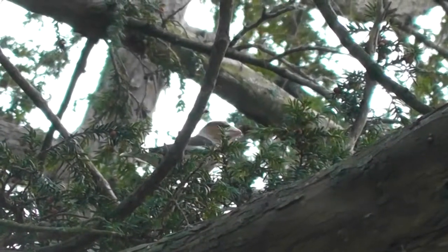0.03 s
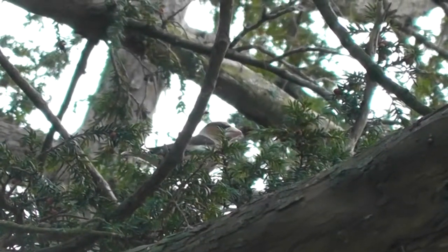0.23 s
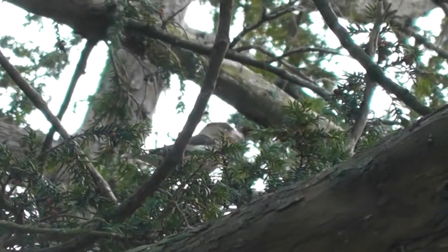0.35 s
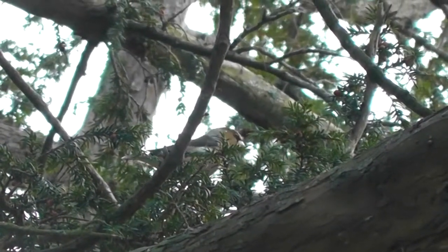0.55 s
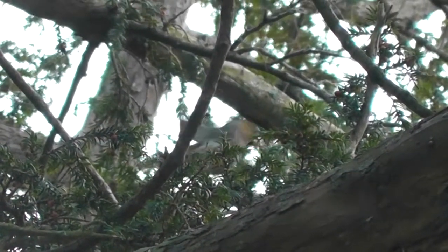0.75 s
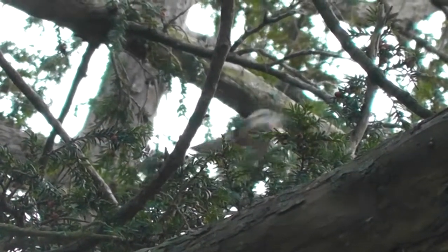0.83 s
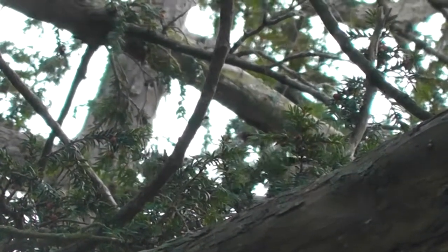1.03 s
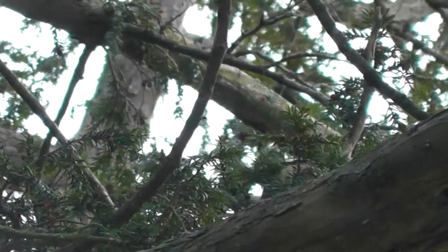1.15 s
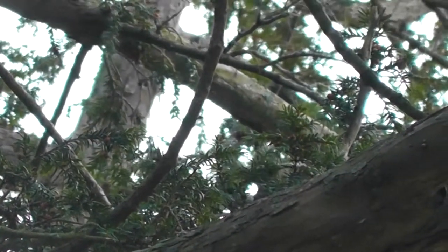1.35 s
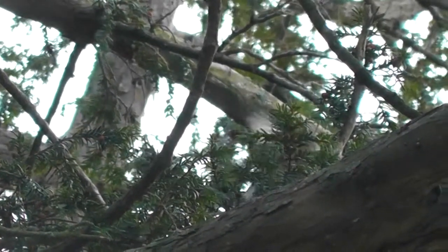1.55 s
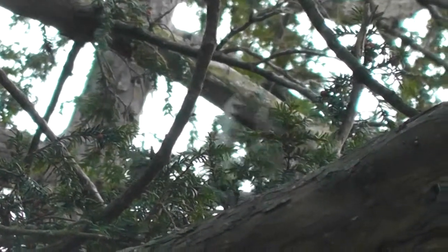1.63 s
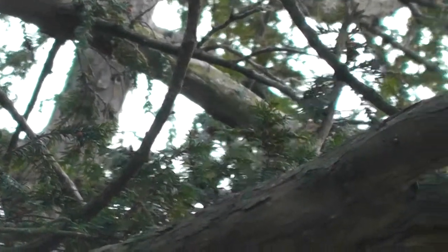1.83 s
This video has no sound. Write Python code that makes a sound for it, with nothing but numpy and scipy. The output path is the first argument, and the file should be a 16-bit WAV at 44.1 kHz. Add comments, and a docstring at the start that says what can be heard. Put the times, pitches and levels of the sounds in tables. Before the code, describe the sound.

A small bird calls twice from dense evergreen foliage: first a high, thin whistle, then a brief, louder buzz. Afterwards the quiet outdoor hush carries on, with faint far-off birds, soft twig clicks and one sharp little snap.

```python
"""A small bird in a dense evergreen gives a thin falling whistle, then a lower, louder buzz.
Each call is a tone on a moving pitch; the buzz comes from a fast vibrato, a wobble of that pitch.
Trunks and foliage scatter the calls into a short fluttering tail. Other birds call faintly farther off.
Twigs tick, knock softly and give one sharp snap, over a low outdoor hush of filtered noise."""
import sys
import numpy as np
from scipy import signal
from scipy.fft import rfft, irfft
from scipy.io import wavfile
from scipy.ndimage import uniform_filter1d

SR = 44100
rng = np.random.default_rng(int(sys.argv[2]) if len(sys.argv) > 2 else 0)


def log_audio(samples):
    """Write samples as a 16-bit WAV file to the path given in sys.argv[1]."""
    # one column per channel
    frames = np.atleast_2d(samples).T
    # limit to full scale, then quantise
    limited = np.clip(frames, -1, 1)
    pcm = np.round(limited * 32767).astype(np.int16)
    wavfile.write(sys.argv[1], SR, pcm)


N = 83790

# tone of the outdoor hush (frequency [Hz], relative level [dB])
HUSH_TONE = [(25, -19.5), (45, -5.5), (96, 1.5), (257, .5), (392, -3), (700, -7), (1100, -11.5),
             (1900, -17), (2710, -25), (3500, -23.5), (4000, -21), (6200, -23), (9000, -30), (12500, -38.5),
             (13700, -43)]
# stereo width of the hush (frequency [Hz], side against middle [dB])
HUSH_WIDTH = [(40, -2), (150, -7), (500, -3.5), (1500, -4), (12000, -15.5)]
# far peeps (start [s], length [s], pitch [Hz], level [dB])
PEEPS = [(0.13, 0.025, 850, -63.5), (1.195, 0.045, 3990, -67), (1.578, 0.019, 2100, -63),
         (1.601, 0.055, 1750, -70), (1.3, 0.065, 3970, -76)]
# faint high twitters (start [s], length [s], first pitch [Hz], last pitch [Hz], level [dB])
FAR_TWITTERS = [(0.941, .05, 7600, 7000, -75), (0.994, 0.043, 6500, 6270, -72),
                (1.036, 0.05, 7300, 7780, -84), (1.113, 0.043, 6000, 5670, -73),
                (1.865, 0.065, 6700, 7340, -66)]
# stereo width of the scattered sound (frequency [Hz], side against middle [dB])
FOLIAGE_WIDTH = [(1000, -0.5), (4000, -10.5), (5500, -11), (8000, -8), (12000, 2.5)]
# the whistle's tune (time [s], pitch [Hz])
WHISTLE_TUNE = [(.166, 7450), (.173, 6000), (.179, 5520), (.186, 5340), (.215, 5170), (.235, 5200),
                (.262, 5278), (.308, 5368), (.319, 5443), (.329, 5270)]
# how hard the bird whistles (time [s], level [dB])
WHISTLE_EFFORT = [(.166, -59), (.173, -42.5), (.186, -34), (.2, -29.5), (.228, -33), (.3, -34),
                  (.318, -27.5), (.329, -44)]
# the whistle's overtone, an octave up (time [s], level against the main tone [dB])
WHISTLE_OCTAVE = [(.168, -31), (.18, -10.5), (.19, -37.5), (.225, -42), (.24, -32), (.32, -26.5)]
# foliage soaks up the overtones (frequency [Hz], gain [dB])
LEAF_FILTER = [(5000, 1.5), (8000, -4), (12000, -4.5)]
# echoes off nearby trunks and boughs (delay [s], gain [dB])
BOUGH_ECHOES = [(.005, -14), (0.0134, -16), (0.022, -21), (0.033, -17), (.052, -15.5)]
# the near bird's direct sound leans left in the treble (frequency [Hz], right ear gain [dB])
RIGHT_EAR_SHADE = [(4000, -1.2), (5300, -2.5), (8000, -5), (12000, -11)]
# small twig ticks (time [s], level [dB], ring [Hz])
TWIG_TICKS = [(.4295, -55, 8600), (.4435, -57.5, 9700), (.4565, -61, 8800), (.865, -49, 8950),
              (.9675, -59.5, 7660), (1.2595, -59.5, 8900), (1.3115, -54, 6200), (1.373, -53.5, 8900),
              (1.807, -55.5, 5700), (1.8455, -49, 5650), (1.882, -66, 4570)]
# twigs lose their highest treble (frequency [Hz], gain [dB])
TWIG_FILTER = [(8800, -2), (10500, -7.5), (13500, -6)]
# the buzz (time [s], centre pitch [Hz], level [dB], harmonic 2 [dB], harmonic 3 [dB]);
# both harmonics are set against the main tone
BUZZ_SHAPE = [(.524, 3900, -49, -30.5, -40.5), (.533, 3960, -31, -30, -37.5), (.553, 3946, -24.5, -38, -38),
              (.58, 4050, -26.5, -25, -40), (.6, 4110, -25, -24.5, -39.5),
              (.625, 4090, -26.5, -30.5, -43.5), (.636, 4080, -27.5, -21, -38)]
# soft knocks (time [s], level [dB], ring [Hz])
SOFT_KNOCKS = [(1.194, -42, 660), (1.526, -40, 280), (1.846, -47.5, 960)]
# the two quick breaks of one snap (time [s], level [dB])
SNAP_BREAKS = [(1.5249, -31), (1.5254, -54)]
# tones the snapping twig rings with (frequency [Hz], gain [dB], time to fade by 60 dB [s])
SNAP_RINGS = [(1070, -8.5, 0.02), (1670, -16, 0.014), (4100, -33, .004), (5680, 4, .006),
              (6420, 2.5, 0.0047), (8120, -2.5, 0.0066)]


def undb(db):
    """Turn decibels into a gain."""
    return 10 ** (np.asarray(db) / 20)


def clock():
    """The time of every sample, in seconds."""
    return np.arange(N) / SR


def curve(rows, column=1):
    """One column of a table, joined by straight lines in time."""
    rows = np.array(rows)
    return np.interp(clock(), rows[:, 0], rows[:, column])


def unit(x):
    """Scale a signal to an average (rms) size of 1."""
    return x / np.sqrt(np.mean(x ** 2))


def pan(db):
    """Left and right gains, with the left louder by db."""
    return undb(np.array([[db], [-db]]) / 2)


def colour(x, points):
    """Filter a sound by a curve of (Hz, dB) points."""
    hz, db = np.array(points).T
    freqs = np.arange(N // 2 + 1) * SR / N + 1
    return irfft(rfft(x) * undb(np.interp(np.log(freqs), np.log(hz), db)), N)


def wander(rate):
    """A smooth random wiggle of size 1 that turns about rate times a second."""
    step = max(int(SR / rate), 1)
    stairs = np.repeat(rng.standard_normal(N // step + 1), step)[:N]
    return unit(uniform_filter1d(stairs, step))


def decay(age, t60):
    """A fade that falls by 60 dB every t60 seconds."""
    return np.exp(-np.log(1000) * age / t60)


def gate(start, end, attack_s=0.0025, release_s=0.0047):
    """Switch a note softly on and off."""
    opening = np.clip((clock() - start) / attack_s + .5, 0, 1)
    closing = np.clip(1 - (clock() - end) / release_s, 0, 1)
    return np.sin(np.pi / 2 * opening * closing) ** 2


def widen(middle, side, width):
    """Make stereo: filter the side signal, add it on the left and subtract it on the right."""
    return middle + colour(side, width) * np.array([[1], [-1]])


def hush(level_db=-54.5, rise_db_per_s=0.3, flicker_db=1):
    """Wide, low outdoor noise that flickers and swells very slightly."""
    middle, side = (unit(colour(rng.standard_normal(N), HUSH_TONE)) * undb(flicker_db * wander(25))
                    for _ in range(2))
    swell = undb(level_db + rise_db_per_s * (clock() - 0.5))
    return widen(middle, side, HUSH_WIDTH) * pan(0.54) * swell


def bird_tone(hz, levels_db):
    """A bird's voice: harmonics at 1, 2, 3... times a moving pitch, each with its own level."""
    phase = 2 * np.pi * np.cumsum(hz) / SR
    return np.sqrt(2) * sum(undb(db) * np.sin(k * phase) for k, db in enumerate(levels_db, 1))


def far_call(start, length, first_hz, last_hz, levels_db, waver, rate):
    """One short, straight slide in pitch, roughened by a random waver."""
    end = start + length
    hz = curve([(start, first_hz), (end, last_hz)]) * (1 + waver * wander(rate))
    return bird_tone(hz, levels_db) * gate(start, end)


def far_birds():
    """Thin peeps, a falling yelp and some twittering, half lost in the wood."""
    calls = far_call(.803, .0332, 945, 772, [-58, -53.5, -64], waver=.035, rate=900)  # the yelp
    for start, length, hz, db in PEEPS:
        calls += far_call(start, length, hz, hz, [db], waver=.0082, rate=500)
    for start, length, first_hz, last_hz, db in FAR_TWITTERS:
        calls += far_call(start, length, first_hz, last_hz, [db], waver=.042, rate=700)
    return calls + undb(-2) * foliage(calls, t60=0.78)


def foliage(sound, t60, build_up_s=0.0058):
    """Countless tiny echoes off leaves and trunks blur into a dying tail."""
    middle, side = rng.standard_normal((2, N))
    fade = np.clip(clock() / build_up_s - .5, 0, 1) * decay(clock(), t60)
    echoes = widen(middle, side, FOLIAGE_WIDTH) * fade / np.sqrt(np.sum(fade ** 2))
    return signal.fftconvolve(sound[None], echoes, axes=1)[:, :N]


def whistle(waver=.002):
    """A nearly pure note that drops steeply, then creeps up to a final accent."""
    hz = curve(WHISTLE_TUNE) * (1 + waver * wander(400))
    tone = bird_tone(hz, [0, curve(WHISTLE_OCTAVE)])
    return tone * undb(curve(WHISTLE_EFFORT)) * gate(WHISTLE_TUNE[0][0], WHISTLE_TUNE[-1][0])


def through_tree(voice):
    """The near bird's voice arrives directly, off the nearest boughs and through the foliage."""
    t = clock()
    direct = np.array([voice, colour(voice, RIGHT_EAR_SHADE)])
    dull = colour(voice, LEAF_FILTER)
    echoes = sum(undb(db) * np.interp(t - delay, t, dull) for delay, db in BOUGH_ECHOES)
    scatter = undb(-5.5) * foliage(dull, t60=0.33)
    tail = undb(-17) * foliage(dull, t60=0.74)
    return direct + echoes + scatter + tail


def taps(rows, t60, width_octaves):
    """Twig ticks or knocks: each contact is a dying burst of noise that rings around one pitch."""
    t, out = clock(), 0
    freqs = np.arange(N // 2 + 1) * SR / N + 1
    for start, db, hz in rows:
        burst = rng.standard_normal(N) * (t >= start) * decay(np.abs(t - start), t60)
        resonance = unit(1 / (1 + (np.log2(freqs / hz) / width_octaves) ** 2))
        out += undb(db) * irfft(rfft(burst) * resonance, N)
    return out


def buzz(vibrato_hz=74.85, dip_s=.563, skew=.3, narrowing_hz_per_s=280, waver=.006):
    """A fast pitch wobble: louder at each crest, richer in overtones at each dip."""
    start, end = BUZZ_SHAPE[0][0], BUZZ_SHAPE[-1][0]
    turn = 2 * np.pi * vibrato_hz * (clock() - dip_s)
    swing = -np.cos(turn) - skew * np.cos(2 * turn)  # flat crests, sharp dips
    depth_hz = 210 - narrowing_hz_per_s * (clock() - start)
    hz = (curve(BUZZ_SHAPE) + depth_hz * swing) * (1 + waver * wander(600))
    overtones_db = [curve(BUZZ_SHAPE, column) - 3.5 * swing for column in (3, 4)]
    effort = undb(curve(BUZZ_SHAPE, column=2) + .8 * wander(250))  # with a slight flutter
    return bird_tone(hz, [4.5 * swing] + overtones_db) * effort * gate(start, end)


def snap(contact_s=.00025):
    """A twig gives way in two quick breaks, and both set the same short tones ringing."""
    out = 0
    for start, db in SNAP_BREAKS:
        age = np.maximum(clock() - start, 0)
        ring = sum(undb(db + ring_db) * np.sin(2 * np.pi * hz * age) * decay(age, t60)
                   for hz, ring_db, t60 in SNAP_RINGS)
        out += ring * np.clip(age / contact_s, 0, 1)
    return out


def scene():
    """Hush, birds and twigs together, in stereo."""
    ticks = taps(TWIG_TICKS, t60=0.02, width_octaves=0.18)
    knocks = taps(SOFT_KNOCKS, t60=0.038, width_octaves=0.5)
    twigs = colour(ticks + knocks + snap(), TWIG_FILTER) * pan(1.7)
    return hush() + through_tree(whistle() + buzz()) + far_birds() + twigs


def record(dry):
    """Cut away the treble above 13700 Hz."""
    return signal.sosfilt(signal.ellip(10, .2, 80, 13700, fs=SR, output="sos"), dry)


dry = scene()
out = record(dry)
log_audio(out)
```